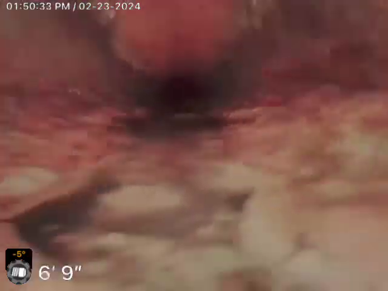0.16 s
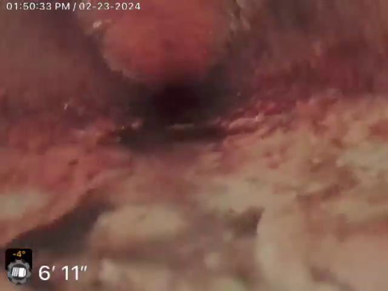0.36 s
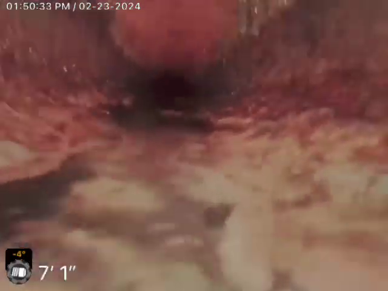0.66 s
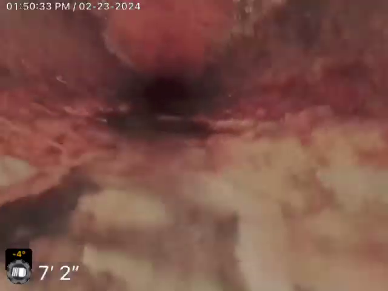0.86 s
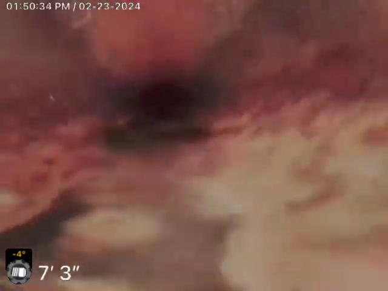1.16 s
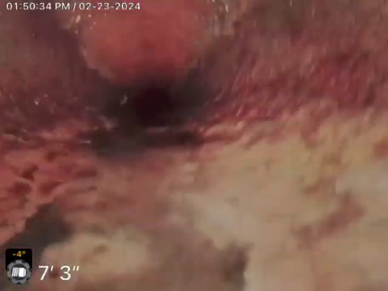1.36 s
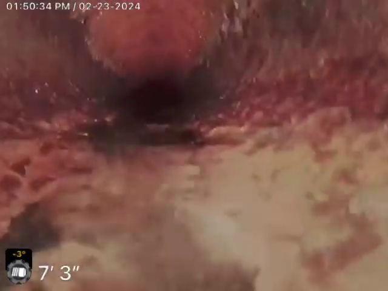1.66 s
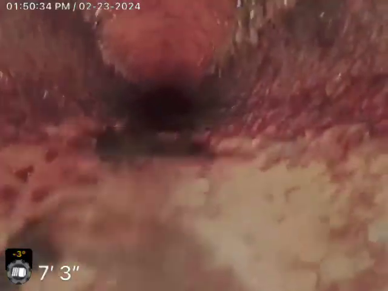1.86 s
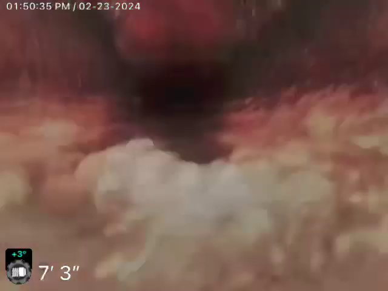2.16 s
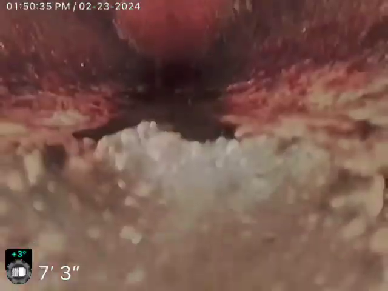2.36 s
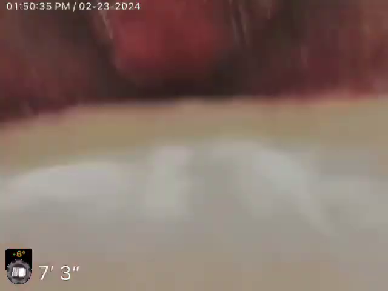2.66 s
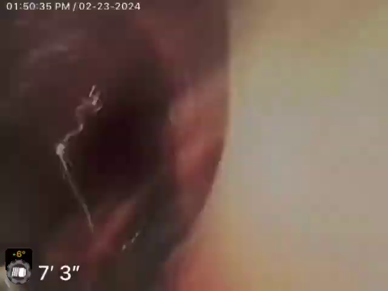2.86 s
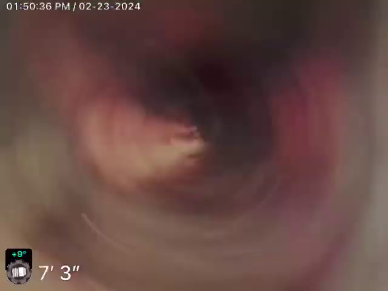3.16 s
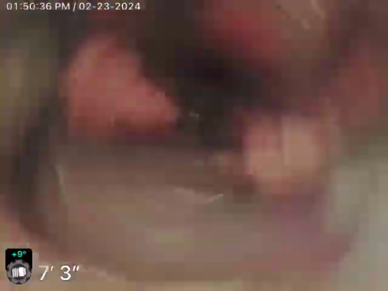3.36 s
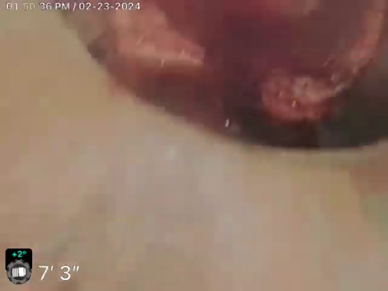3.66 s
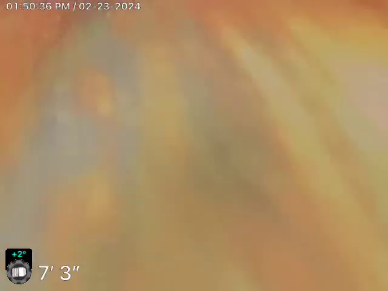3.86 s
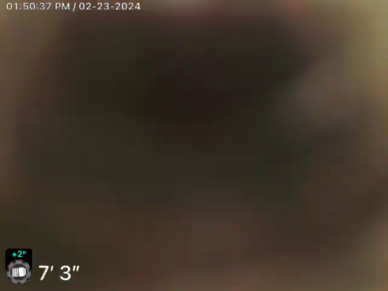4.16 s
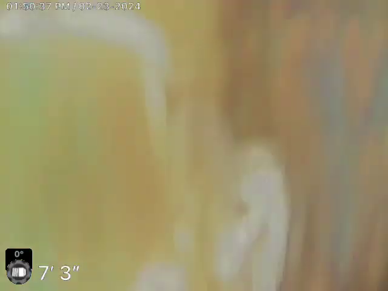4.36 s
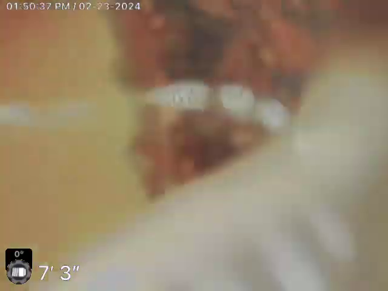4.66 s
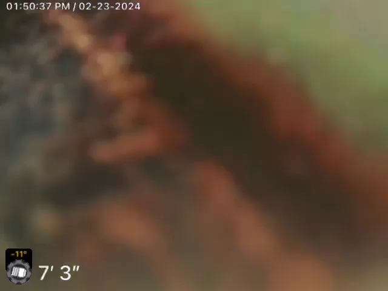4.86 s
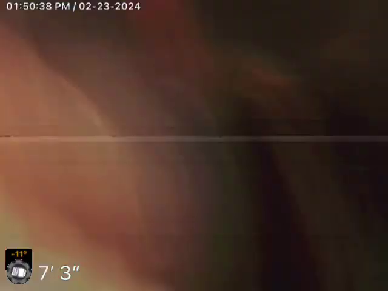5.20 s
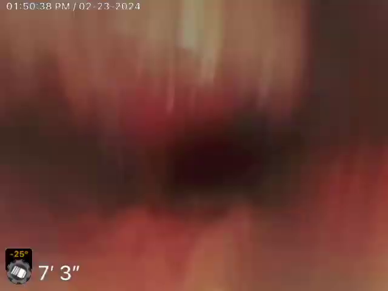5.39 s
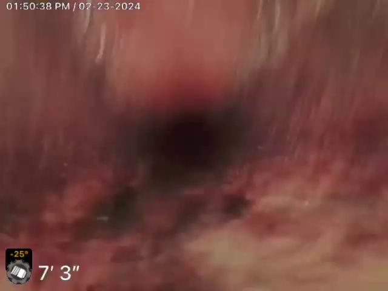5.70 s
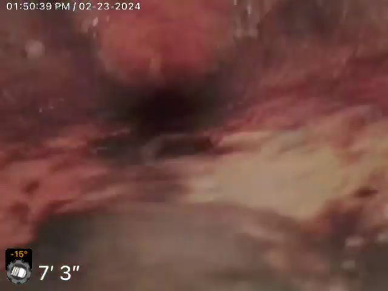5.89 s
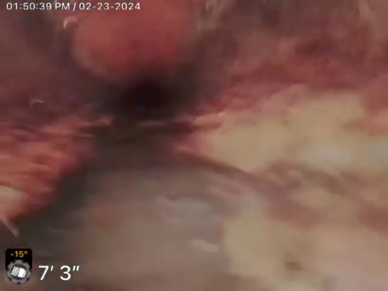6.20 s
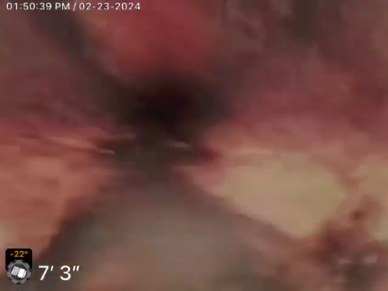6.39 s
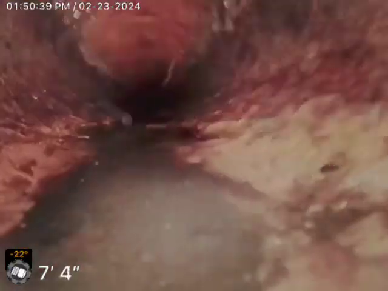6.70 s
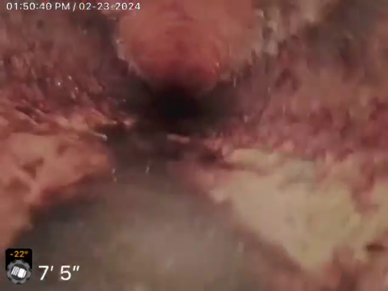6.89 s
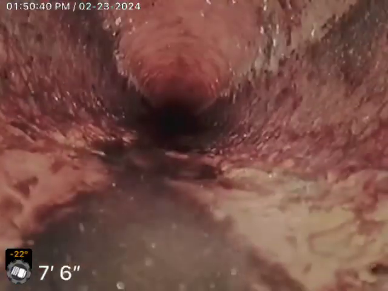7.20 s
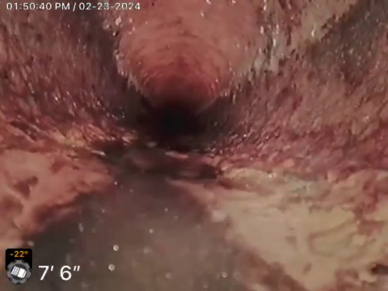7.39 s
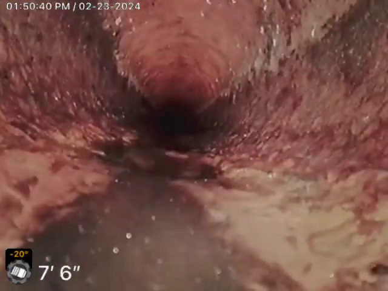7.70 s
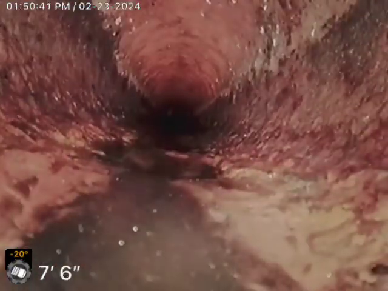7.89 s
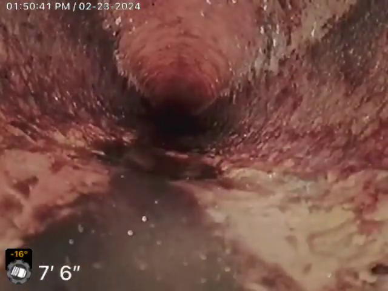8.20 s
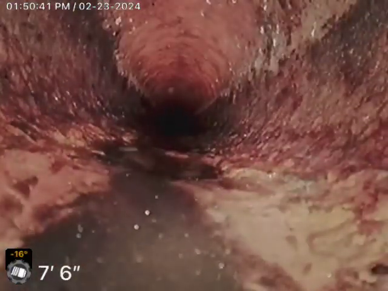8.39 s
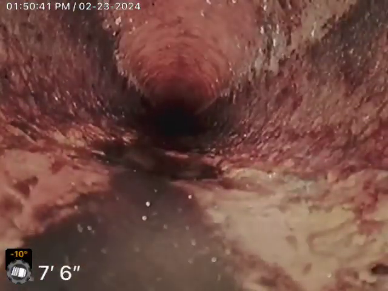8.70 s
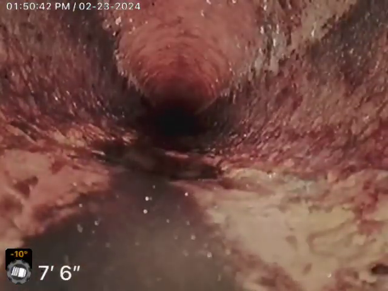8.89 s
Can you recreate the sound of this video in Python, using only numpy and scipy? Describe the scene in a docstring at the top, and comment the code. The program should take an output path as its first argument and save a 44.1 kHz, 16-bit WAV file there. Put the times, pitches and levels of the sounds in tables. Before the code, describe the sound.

Jerky metallic clatter of a drain cable being pulled back, with a hollow-knocking lull, a second loud burst, and quiet near-microphone ticking over low hum.

```python
"""A springy drain cable slaps a steel reel in sharp, bright flurries as it is pulled back in jerks.
Noise bursts through the reel's resonances make the slaps; steel spokes ring on and a small hard room answers.
Streams of tiny contacts make the cable scrape, hiss and scuff; rough sines make it squeak and knock hollowly.
Afterwards something rustles, ticks and plops softly near the microphone.
A slowly sinking drone and a hum, both wavering, go on throughout over filtered noise."""
import sys
import numpy as np
from scipy import signal
from scipy.fft import rfft, irfft, next_fast_len
from scipy.io import wavfile
from scipy.ndimage import map_coordinates

SR = 44100
rng = np.random.default_rng(int(sys.argv[2]) if len(sys.argv) > 2 else 0)


def waveform_to_disk(signal):
    """Save audio, clipped to [-1, 1], as 16-bit WAV at the path in sys.argv[1]."""
    frames = np.transpose(np.atleast_2d(signal))
    scaled = np.clip(frames, -1, 1) * 32767
    samples = np.round(scaled).astype(np.int16)
    wavfile.write(sys.argv[1], SR, samples)


N = 399098  # length in samples
TOP_HZ = 7020  # upper edge of the sound's band

# Resonances of the guide the cable runs through. Each row: frequency in Hz, width in Hz, lift in dB.
GUIDE_MODES = [(476, 50, 10.5), (645, 82, 10.5), (746, 61, 8), (854, 18, 7.5), (1325, 33, 0.5),
               (1720, 190, 6), (1830, 290, 3), (2010, 580, 4), (2700, 300, 5), (3080, 170, 3),
               (3880, 350, 6.5)]


def amp(db):
    """Decibels to gain."""
    return 10 ** (np.asarray(db) / 20)


def unit(x):
    """Scale to rms 1."""
    return x / np.sqrt(np.mean(x ** 2) + 1e-20)


def along(points, hz):
    """(Hz, value) points read on a log frequency axis."""
    f, v = np.transpose(points)
    return np.interp(np.log(hz + 1), np.log(f + 1), v)


def wobble(rate):
    """A smooth random curve with rate knots a second."""
    knots = rng.standard_normal(int(N * rate / SR) + 4)
    return map_coordinates(knots, [np.arange(N) * rate / SR])


def add(track, s, sound):
    """Mix a sound into a track at time s in seconds."""
    part = track[max(round(s * SR), 0):][:len(sound)]
    part += sound[:len(part)]


def coloured(x, colour, modes=(), size=8192):
    """x through a causal filter of unit energy: a smooth colour lifted at each resonance."""
    hz = np.fft.rfftfreq(size, 1 / SR)
    db = along(colour, hz)
    for f, width, lift in modes:
        db = db + lift / (1 + (2 * (hz - f) / width) ** 2)
    gain = amp(db) / (1 + (hz / TOP_HZ) ** 20) + 1e-6
    # Folding the cepstrum gives minimum phase: the filter answers at once, with no pre-echo.
    cepstrum = irfft(np.log(gain))[:size // 2]
    cepstrum[0] /= 2
    ring = irfft(np.exp(rfft(2 * cepstrum, size)))
    return signal.fftconvolve(x, ring / np.linalg.norm(ring))[:len(x)]


def grains(rate, spread_db):
    """Tiny contacts of uneven size at random moments, rate a second on average, rms 1."""
    hit = rng.random(N) < rate / SR
    sign = rng.choice([-1, 1], N)
    size = amp(spread_db * np.clip(rng.standard_normal(N), -2, 2))
    return unit(hit * sign * size)


def burst(length, rise):
    """Envelope of a flurry of contacts: it builds up, holds and dies away; times in seconds."""
    t = np.arange(SR // 3) / SR
    return (1 - np.exp(-t / rise)) * np.exp(-(t / length) ** 2)


def chatter(length, rise, hardness, vary_db, snap, count=36):
    """A first hard contact and a flurry of rebounds, as noise whose colour differs from blow to blow."""
    shape = burst(length, rise) + snap * burst(0.0041, rise)
    hz = np.fft.rfftfreq(len(shape), 1 / SR)
    offsets = rng.uniform(-1.97, 2.11, count)
    spot_db = vary_db * np.interp(hz, np.linspace(0, TOP_HZ, count), offsets)
    noise = rfft(rng.standard_normal(len(shape)))
    contacts = irfft(noise * amp(along(hardness, hz) + spot_db), len(shape))
    return shape * contacts


def strokes(rows, rise, fall, size=4096):
    """Gain of (start s, length s, dB) movements: each builds up, holds and dies away; their powers add."""
    t = np.linspace(0, N / SR, size)
    each = []
    for s, length, db in rows:
        before = np.maximum(s - t, 0)
        after = np.maximum(t - s - length, 0)
        each.append(amp(db) * np.exp(-before / rise - after / fall))
    return np.interp(np.arange(N) / SR, t, np.linalg.norm(each, axis=0))


def tone(hz):
    """A sine of rms 1 that follows a pitch curve."""
    return np.sqrt(2) * np.sin(2 * np.pi * np.cumsum(hz) / SR)


def rough_note(hz, shape, roughness):
    """A sine of rms 1 under an envelope; its phase drifts at random, so it sounds rough."""
    drift = roughness * np.cumsum(rng.standard_normal(len(shape)))
    t = np.arange(len(shape)) / SR
    return np.sqrt(2) * shape * np.sin(2 * np.pi * hz * t + drift)


def slaps():
    """The cable slaps the reel: a soft slap knocks, a hard one is bright, and the reel's modes colour both."""
    # Cable slaps. Each row: start in seconds, level in dB, chatter length in seconds, hardness in dB.
    slap_rows = [(0.02, -16.5, .013, -2.5), (0.151, -22, .014, -5), (0.236, -15.5, 0.029, 2),
                 (0.332, -20, 0.023, -1.5), (0.348, -18.5, 0.023, -4.5), (0.436, -13.5, 0.016, 5),
                 (0.553, -11, .012, -1), (0.628, -10.5, 0.0077, 9), (0.659, -12.5, 0.0047, -1.5),
                 (0.674, -12.5, 0.016, 6.5), (0.745, -19.5, 0.017, -1), (0.825, -11.5, 0.017, 5),
                 (0.871, -14, 0.024, 1.5), (0.951, -21.5, .026, -2), (1.021, -11, .015, 8.5),
                 (1.061, -14, .024, 3.5), (1.143, -13.5, 0.012, -3.5), (1.195, -9.5, 0.011, 7.5),
                 (1.228, -13.5, 0.014, 5), (1.337, -20.5, 0.014, -4), (4.341, -52, 0.019, -3.5),
                 (4.551, -56.5, 0.039, -5.5), (4.682, -16.5, 0.029, -3), (4.698, -8, 0.0093, -4),
                 (4.869, -25, 0.023, -4.5), (4.946, -9, 0.014, 4), (4.957, -10, .019, -4),
                 (5.052, -17, 0.017, -3.5), (5.170, -9, 0.014, 1), (5.3, -25, 0.027, -4.5),
                 (5.886, -22, 0.024, -5), (5.916, -20, 0.021, -5.5), (6.043, -9, 0.01, 13),
                 (6.061, -12.5, 0.011, 2), (6.152, -20, 0.014, 2), (6.259, -17, 0.042, 2.5),
                 (6.309, -7, 0.011, 1.5)]
    # Overall spectrum of the slaps. Each row: frequency in Hz, level in dB.
    slap_colour = [(40, -27), (110, -5.5), (250, -10), (380, -14.5), (700, 0), (1300, -2), (2500, -3.5),
                   (4000, -6.5), (5800, -9.5), (6900, -17)]
    # The reel's resonances. Each row: frequency in Hz, width in Hz, lift in dB.
    reel_modes = [(130, 7.7, 14), (214, 50, 12.5), (310, 49, 15.5), (477, 60, 11), (614.6, 35, -7),
                  (782, 56, 6.5), (845.5, 90, 9.5), (1084, 60, 3), (1384, 84, 8.5), (1510, 60, 3),
                  (1684, 51, 5.5), (1850, 130, 3), (2430, 26, 4.5), (2537, 160, 8), (2690, 220, 7.5),
                  (3120, 130, -6), (3360, 75, 8), (3620, 160, 3.5), (3680, 200, 6), (4060, 92, -1.5),
                  (4420, 250, 3.5), (5630, 56, 5)]
    blows = np.zeros(N)
    for s, db, length, hard_db in slap_rows:
        # Each dB of hardness takes 1 dB off the body and adds 0.56 dB of treble.
        body_db, treble_db = -9 - hard_db, 1.5 + 0.56 * hard_db
        hardness = [(850, body_db), (1400, 0), (3000, 0), (5000, treble_db)]
        blow = chatter(length, 0.0021, hardness, vary_db=2.5, snap=0.62, count=56)
        add(blows, s, amp(db) * blow)
    return coloured(blows, slap_colour, reel_modes)


def cage(x):
    """The steel spokes ring on in sympathy: each mode is a decaying sine set off by the sound x."""
    # Ringing spokes. Each row: frequency in Hz, level in dB, time to fall by 60 dB in seconds.
    spoke_modes = [(630, -24.5, 0.43), (869, -28, 1), (1078, -27.5, 0.91), (1700, -37, 0.54),
                   (2540, -30, 0.5), (2524, -28, 0.63), (3630, -31.5, 0.36)]
    t = np.arange(SR) / SR
    ring = np.zeros(SR)
    for hz, db, t60 in spoke_modes:
        mode = amp(-60 * t / t60) * np.sin(2 * np.pi * hz * t)
        ring += amp(db) * mode / np.linalg.norm(mode)
    return signal.fftconvolve(x, ring)[:N]


def slide():
    """Each pull makes the cable judder and hiss through its guide, while the reel rumbles round and sways."""
    # Pulls on the cable. Each row: start in seconds, length in seconds, scrape in dB, hiss over scrape in dB.
    pull_rows = [(0.0, 0.48, -38, -11.5), (0.47, 0.87, -35, -15), (1.585, 0.48, -59.5, -10),
                 (1.96, 0.053, -52, -3.5), (2.69, 0.077, -35.5, -11.5), (2.792, 0.06, -38.5, -2.5),
                 (4.822, 0.22, -34.5, -18.5), (5.123, .17, -31.5, -14.5), (5.654, 0.15, -39, -11.5),
                 (5.898, 0.44, -35.5, -14.5), (6.553, 0.046, -40, -17.5), (6.776, 0.3, -63.5, -10)]
    # Short skids of the cable. Each row: start in seconds, level in dB, length in seconds, hiss over it in dB.
    skid_rows = [(2.048, -40.5, .032, -3), (2.532, -47.5, 0.034, -2.5), (2.549, -43.5, 0.084, 2.5),
                 (2.69, -35, .03, -13), (2.735, -28.5, 0.012, 10), (4.653, -33.5, 0.09, -20.5),
                 (5.088, -41, 0.029, 8.5), (5.694, -36, 0.036, -12.5), (5.732, -29.5, 0.035, -8.5),
                 (6.021, -27, 0.015, 2), (6.572, -30.5, 0.034, -30)]
    # Spectrum of the scrape. Each row: frequency in Hz, level in dB.
    scrape_colour = [(150, -25), (400, -8), (900, -3), (1900, -3.5), (2500, -2), (4000, -6.5), (6900, -14)]
    # Spectrum of the hiss. Each row: frequency in Hz, level in dB.
    hiss_colour = [(500, -23.5), (2000, 2), (4000, 5.5), (5500, -0.5), (6400, 10), (6750, 14.5),
                   (7000, -14.5)]
    # Spectrum of the reel's rumble. Each row: frequency in Hz, level in dB.
    rumble_colour = [(40, -16.5), (100, -5), (200, -0.5), (300, -4.5), (400, -9), (900, -33.5)]
    # The reel's low resonances. Each row: frequency in Hz, width in Hz, lift in dB.
    drum_modes = [(147.4, 28, 13.5), (209.5, 14, 9), (234.3, 19, 12.5), (290, 29, 9.5)]
    rise_s, fall_s = 0.025, 0.11  # jerked into motion, then coasting to rest
    rub = strokes([(s, length, db) for s, length, db, _ in pull_rows], rise_s, fall_s)
    run = strokes([(s, length, db + hiss_db) for s, length, db, hiss_db in pull_rows], rise_s, fall_s)
    # Rumble lies 13 dB below a 0 dB scrape and changes 0.83 dB for each dB of scrape.
    spin = amp(-13) * rub ** 0.83
    judder = amp(2.2 * wobble(45))
    # Skids scrape and hiss, but leave the rumble alone.
    for s, db, length, bright_db in skid_rows:
        skid = amp(db) * burst(length, 0.005)
        add(rub, s, skid)
        add(run, s, amp(bright_db) * skid)
    scrape = coloured(grains(rate=1000, spread_db=3.5) * rub * judder, scrape_colour, GUIDE_MODES)
    hiss = coloured(grains(rate=10000, spread_db=1.0) * run * judder, hiss_colour)
    rumble = coloured(rng.standard_normal(N) * spin, rumble_colour, drum_modes)
    # The reel frame's sway: a wavering 82 Hz tone.
    boom = spin * amp(-13 + 1.4 * wobble(27)) * tone(82 + 8 * wobble(25))
    return scrape + hiss + rumble + boom


def squeaks():
    """Stick and slip makes the cable sing in short, rough notes."""
    # Sung notes. Each row: start in seconds, pitch in Hz, level in dB, length in seconds.
    squeak_rows = [(2.73, 2030, -41, .1), (2.852, 2040, -23.5, 0.038), (2.91, 641.6, -35, 0.13),
                   (3.224, 1635, -59, 0.093), (3.533, 1690, -59, .15), (6.748, 3920, -43, 0.028),
                   (6.75, 1730, -51, 0.13)]
    sung = np.zeros(N)
    for s, hz, db, length in squeak_rows:
        note = rough_note(hz, burst(length, 0.027), roughness=0.0013 * np.sqrt(hz))
        add(sung, s, amp(db) * note)
    return sung


def knocks():
    """The cable bumps the drain's mouth, which answers with a short hollow note."""
    # Duller knocks. Each row: start in seconds, level in dB, hollow note relative to it in dB.
    knock_rows = [(1.814, -30.5, 0), (2.628, -35.5, -17), (2.914, -25, -14), (3.17, -54, -10),
                  (3.812, -54, -10), (3.926, -58, -14), (4.613, -31, -16), (5.493, -36, -3),
                  (5.617, -29.5, -9), (6.85, -30.5, -11)]
    # Spectrum of a knock. Each row: frequency in Hz, level in dB.
    knock_colour = [(40, -24), (200, -5), (400, -12), (1000, -1.5), (1500, -6), (2600, -2), (3300, -5),
                    (4200, -14), (6900, -20.5)]
    # Resonances of the drain's mouth. Each row: frequency in Hz, width in Hz, lift in dB.
    mouth_modes = [(287, 80, 9), (487, 68, 4), (643, 53, 4), (1640, 160, 5)]
    hollow_hz, flurry_s = 862, 0.023
    hardness = [(2700, 0), (4600, -4.5)]  # (Hz, dB)
    blows, notes = np.zeros(N), np.zeros(N)
    for s, db, note_db in knock_rows:
        blow = chatter(flurry_s, 0.0014, hardness, vary_db=0.7, snap=0.2)
        note = rough_note(hollow_hz, burst(0.042, 0.008), roughness=0.042)
        add(blows, s, amp(db) * blow)
        add(notes, s, amp(db + note_db) * note)
    return coloured(blows, knock_colour, mouth_modes), notes


def drag():
    """Slow turning in the pipe lets the cable catch and slip in sparse, soft scuffs."""
    # Gentle turns of the cable. Each row: start in seconds, length in seconds, level in dB.
    turn_rows = [(3.25, 0.085, -58.5), (3.66, 0.093, -50.5), (3.95, 0.17, -57)]
    # Spectrum of the scuffs. Each row: frequency in Hz, level in dB.
    drag_colour = [(60, -3), (150, 7), (290, 10.5), (380, -10), (1000, -4.5), (1600, -6.5), (2600, -12),
                   (4000, -16), (6900, -22.5)]
    turning = strokes(turn_rows, rise=0.067, fall=0.054) * amp(4.3 * wobble(33))
    return coloured(turning * grains(rate=390, spread_db=0.5), drag_colour, GUIDE_MODES)


def room(x, count=24):
    """The walls' answer: each frequency dies at its own speed, with a fresh noise tail for each stretch."""
    # Reverberation. Each row: frequency in Hz, time to fall by 60 dB in seconds.
    room_decay = [(100, 0.96), (300, 0.79), (1000, 0.54), (3000, 0.47), (7000, 0.4)]
    wet = np.zeros(N)
    for part in np.array_split(np.arange(N), count):
        hz, t, z = signal.stft(rng.standard_normal(SR * 2 // 3), SR, nperseg=256)
        decay = amp(-60 * t / along(room_decay, hz)[:, None])
        tail = signal.istft(z * decay, SR, nperseg=256)[1]
        tail *= 1 - np.exp(-np.arange(len(tail)) / SR / 0.0019)  # the echoes take a moment to build up
        add(wet, part[0] / SR, signal.fftconvolve(x[part], tail / np.linalg.norm(tail)))
    return wet


def handling():
    """Dry rubs near the microphone, as crackling contacts, with a few ringing ticks and one soft plop."""
    # The faint rustle under the rubs. Each row: start in seconds, length in seconds, level in dB.
    rustle_rows = [(7.1, 1.95, -67)]
    # Soft rubs. Each row: start in seconds, length in seconds, level in dB.
    rub_rows = [(7.13, 0.21, -60), (7.391, 0.075, -62), (7.531, 0.021, -63), (7.77, 0.15, -67),
                (8.184, 0.11, -65), (8.299, 0.14, -57), (8.513, .03, -59), (8.672, 0.018, -55.5)]
    # Spectrum of rubs and rustle. Each row: frequency in Hz, level in dB.
    rustle_colour = [(180, -43), (300, -13), (619, -5), (1260, -4), (4360, -2.5), (6300, -5), (7000, -13),
                     (9100, -47), (15400, -120)]
    # Small near ticks. Each row: start in seconds, level in dB, ring in Hz.
    tick_rows = [(7.418, -31, 3480), (8.2043, -36, 1960), (8.4212, -32, 2510), (8.4426, -32, 1290),
                 (8.4726, -32, 1910), (8.5104, -27, 4400), (8.525, -35, 2040), (8.603, -38, 2550),
                 (8.8855, -27.5, 2550)]
    # A soft falling plop, in one row: level in dB, start pitch in Hz, time to fall by 60 dB in seconds.
    plop = (-40, 500, 0.1)
    pressure = strokes([*rustle_rows, *rub_rows], rise=0.025, fall=0.011) * amp(2.7 * wobble(40))
    creases = pressure * grains(rate=3000, spread_db=4)
    pings, t = np.zeros(N), np.arange(SR // 4) / SR
    ping_db, ping_t60_s = -16, 0.014  # ring of a tick, relative to its click
    for s, db, hz in tick_rows:
        add(creases, s, amp([db]))  # a click of one sample
        add(pings, s, amp(db + ping_db - 60 * t / ping_t60_s) * np.sin(2 * np.pi * hz * t))
    near = coloured(creases, rustle_colour) + pings
    db, start_hz, t60 = plop
    phase = 2 * np.pi * np.cumsum(start_hz * np.exp(-t / 0.0115)) / SR
    shape = amp(db - 60 * t / t60) * (1 - np.exp(-t / 0.0022))
    add(near, 8.846, shape * np.sin(phase))
    return near


def background():
    """A sinking drone and a hum of level pitch, both sines, waver and swell over the room's noise rumble."""
    # Swells of the drone. Each row: start in seconds, length in seconds, level in dB.
    drone_swells = [(0.75, 0.41, -47), (2.55, 0.19, -52), (2.95, 0.53, -50.5), (4.9, 0.73, -50.5),
                    (7.25, .95, -55.5), (8.8, 0.1, -53.5)]
    # Swells of the hum. Each row: start in seconds, length in seconds, level in dB.
    hum_swells = [(0.3, .45, -54), (0.98, 0.31, -45.5), (4.5, .5, -50.5), (6.33, 0.27, -52.5),
                  (7.95, 0.58, -56)]
    # Spectrum of the rumble. Each row: frequency in Hz, level in dB.
    floor_colour = [(20, -15), (45, 0), (80, 1), (130, -4), (250, -10.5), (400, -18), (1000, -22.5),
                    (3000, -28), (7000, -38.5)]
    swell_s = 0.071  # time constant of a swell's rise and fall
    drone_hz = 63.4 - 1.35 * np.arange(N) / SR  # sinks by 1.35 Hz a second
    # Swells add in power to the resting levels.
    drone_level = np.hypot(amp(-58.5), strokes(drone_swells, swell_s, swell_s))
    hum_level = np.hypot(amp(-65), strokes(hum_swells, swell_s, swell_s))
    drone = drone_level * tone(drone_hz + 2.8 * wobble(11)) * amp(1.6 * wobble(6.9))
    hum = hum_level * tone(93.4 + 2.5 * wobble(24)) * amp(1.0 * wobble(27))
    floor = amp(-57) * coloured(rng.standard_normal(N), floor_colour)
    return drone + hum + floor


def scene():
    """Slaps, scrape and bumps excite the walls; slaps and scrape also set the spokes ringing."""
    clatter, scrape, (thuds, notes) = slaps(), slide(), knocks()
    bumps = thuds + drag()
    spokes = cage(clatter + amp(-3.5) * scrape)
    walls = room(clatter + amp(-1.0) * (bumps + scrape))
    cable = clatter + bumps + notes + squeaks() + scrape + spokes
    return (cable + walls + handling() + background())[None]


def record(dry):
    """A narrow-band recorder: it rounds off peaks near full scale, then cuts steeply above the band."""
    m = next_fast_len(N + SR // 2)
    hz = np.fft.rfftfreq(m, 1 / SR)
    clipped = dry / (1 + np.abs(dry / 0.78) ** 6) ** (1 / 6)
    lowpass = 1 / np.sqrt(1 + (hz / TOP_HZ) ** 180)
    return irfft(rfft(clipped, m) * lowpass, m)[..., :N]


dry = scene()
out = record(dry)
waveform_to_disk(out)
```